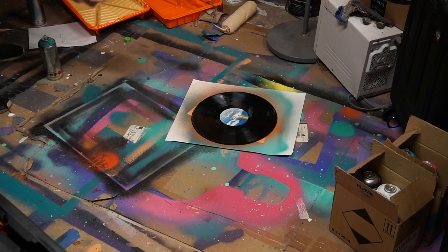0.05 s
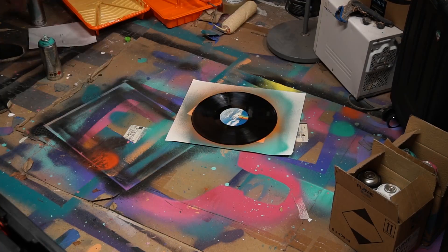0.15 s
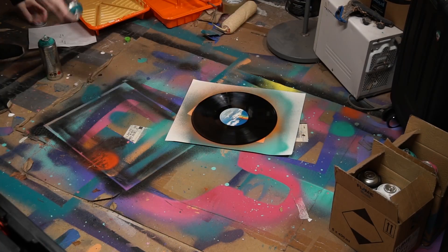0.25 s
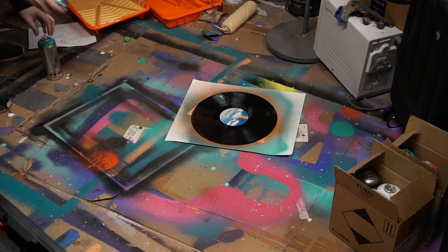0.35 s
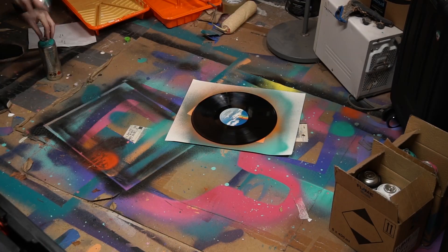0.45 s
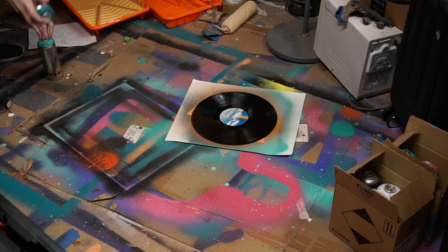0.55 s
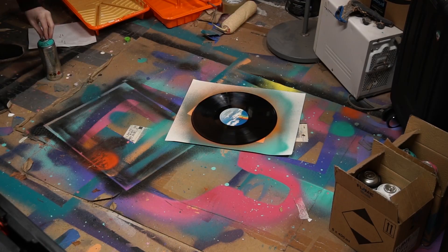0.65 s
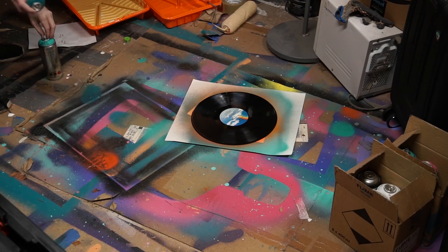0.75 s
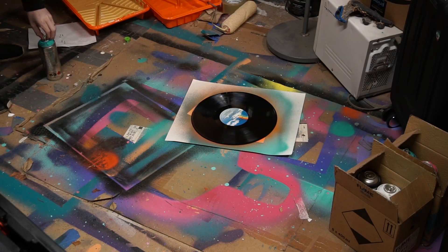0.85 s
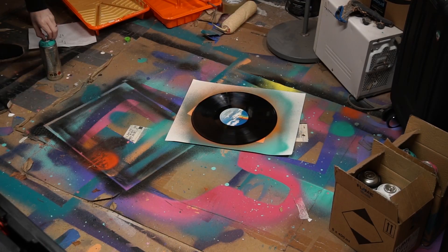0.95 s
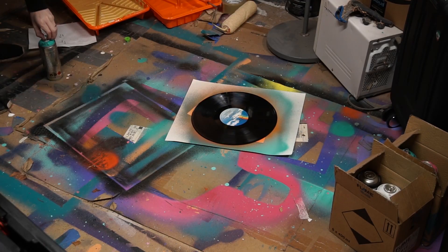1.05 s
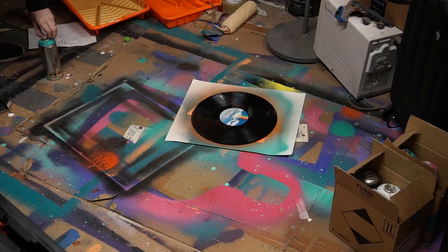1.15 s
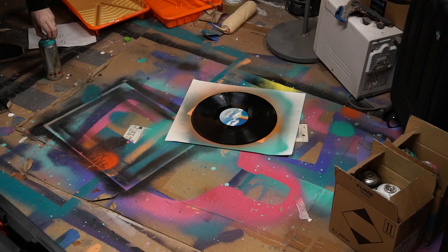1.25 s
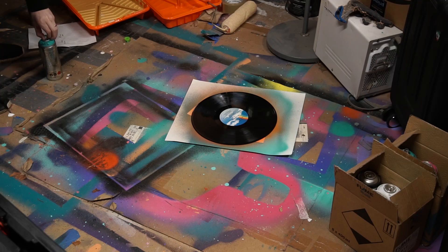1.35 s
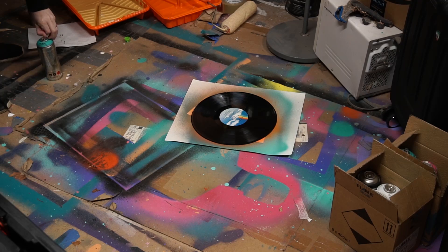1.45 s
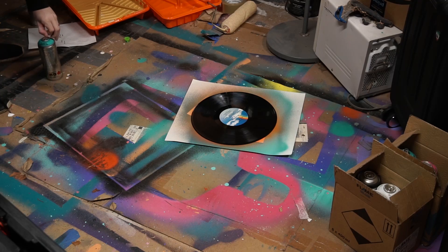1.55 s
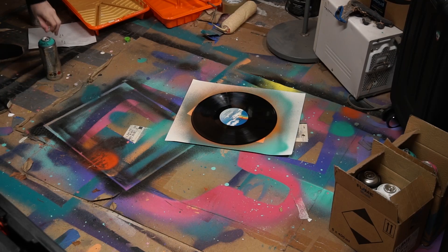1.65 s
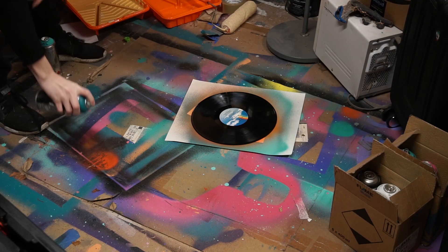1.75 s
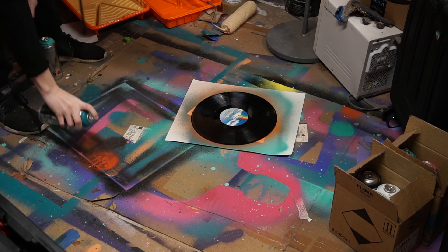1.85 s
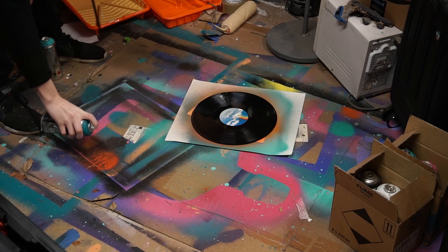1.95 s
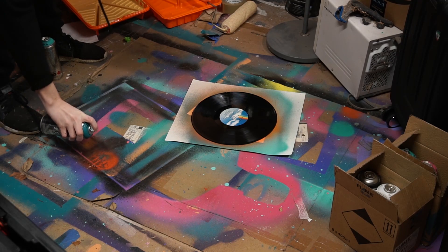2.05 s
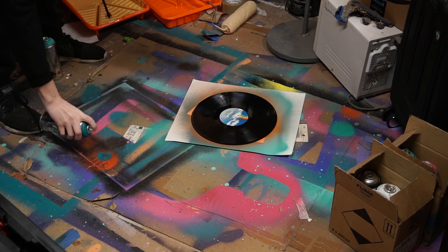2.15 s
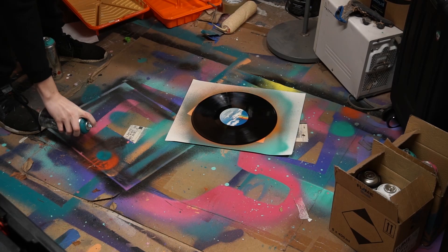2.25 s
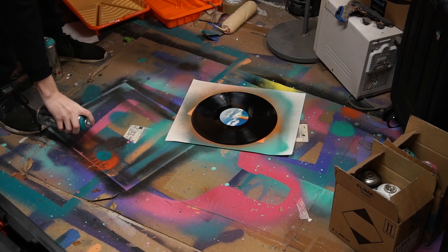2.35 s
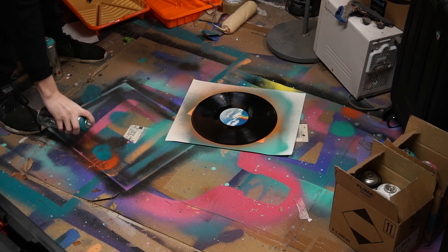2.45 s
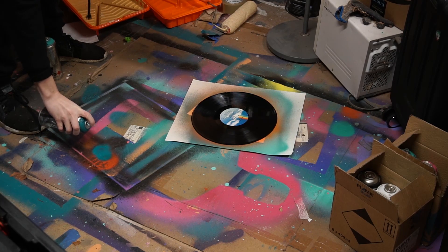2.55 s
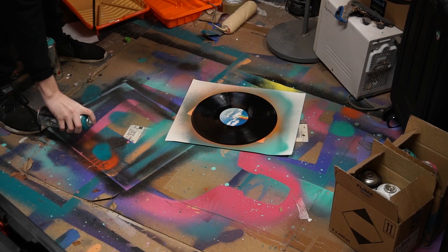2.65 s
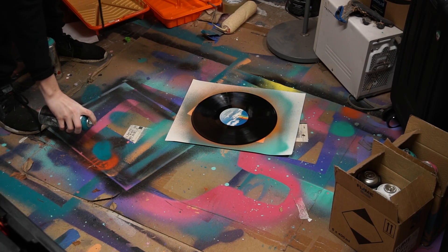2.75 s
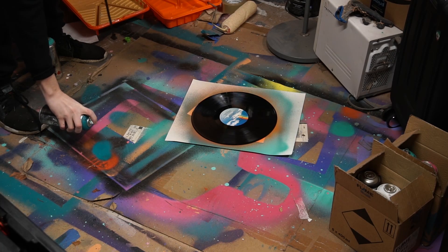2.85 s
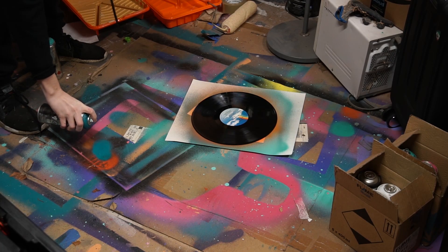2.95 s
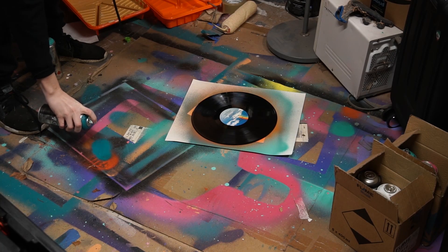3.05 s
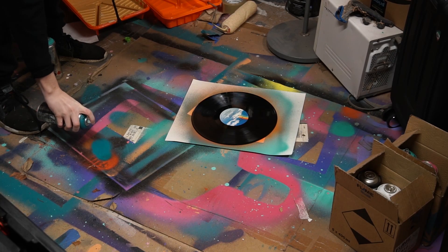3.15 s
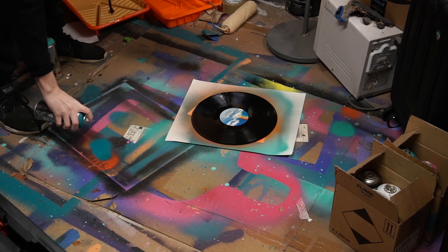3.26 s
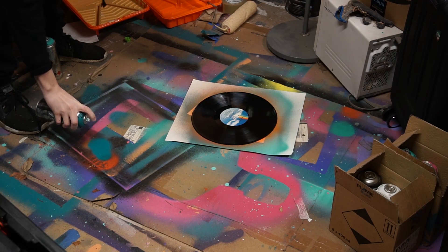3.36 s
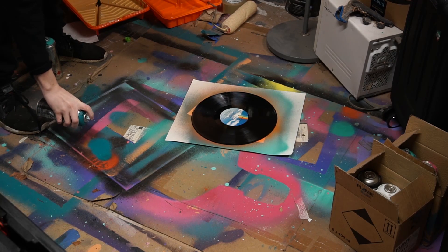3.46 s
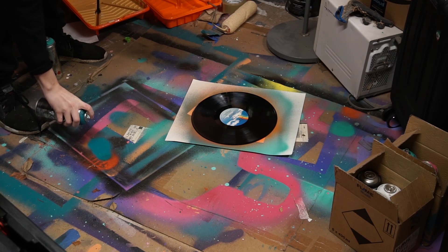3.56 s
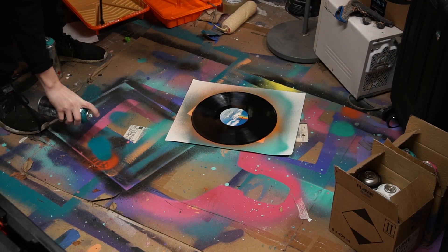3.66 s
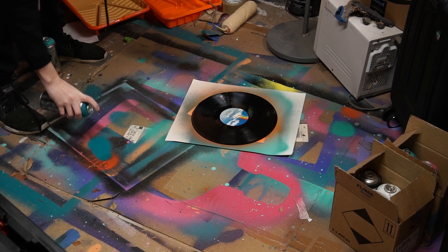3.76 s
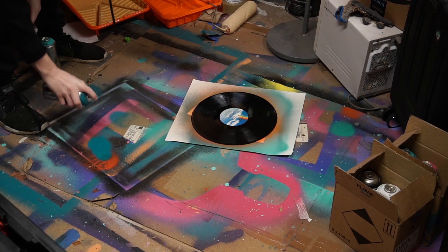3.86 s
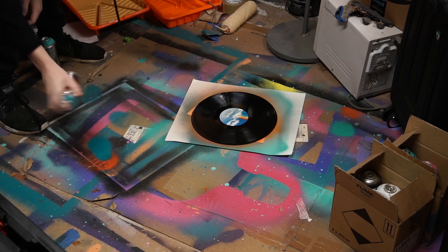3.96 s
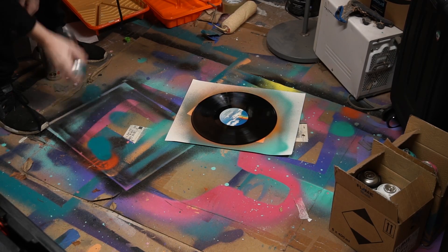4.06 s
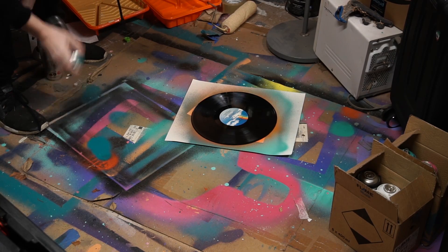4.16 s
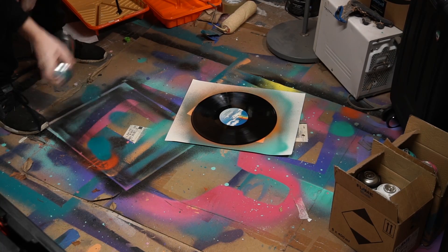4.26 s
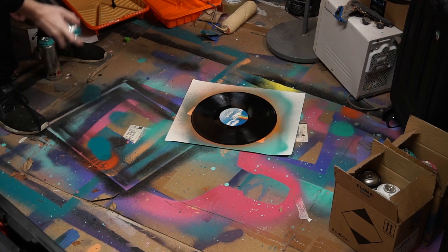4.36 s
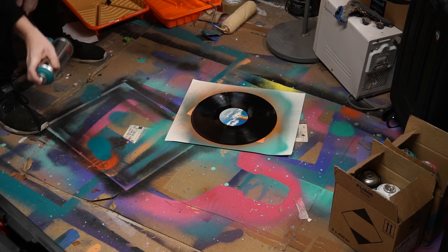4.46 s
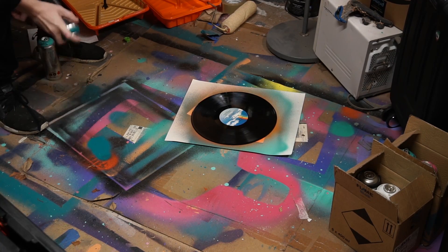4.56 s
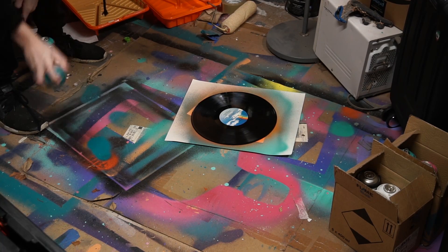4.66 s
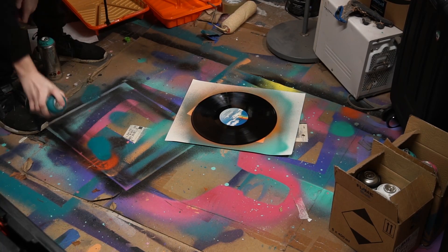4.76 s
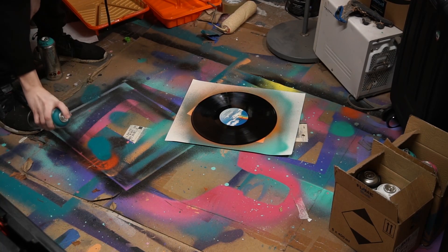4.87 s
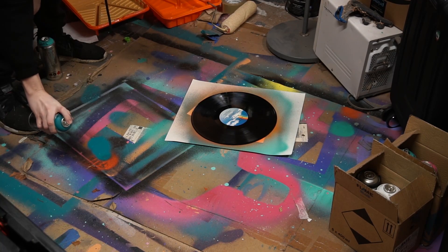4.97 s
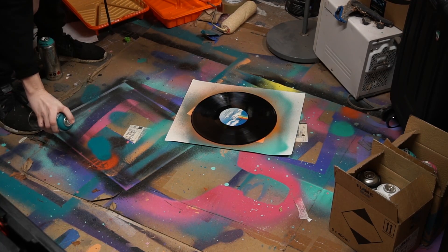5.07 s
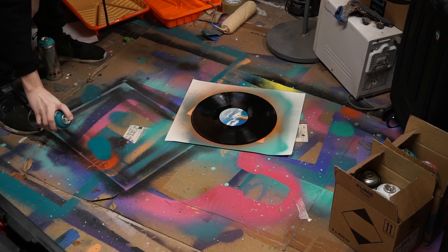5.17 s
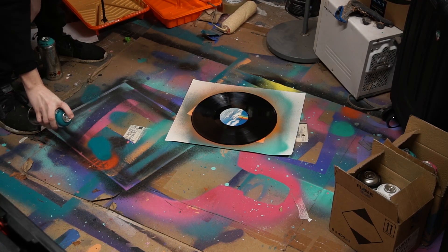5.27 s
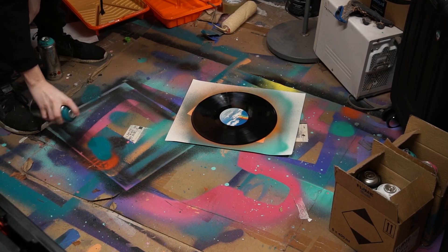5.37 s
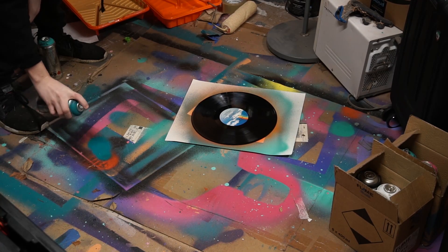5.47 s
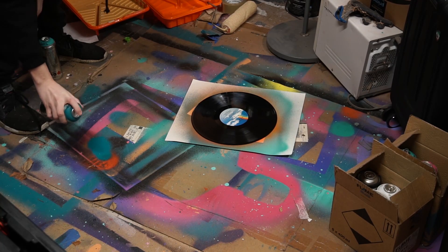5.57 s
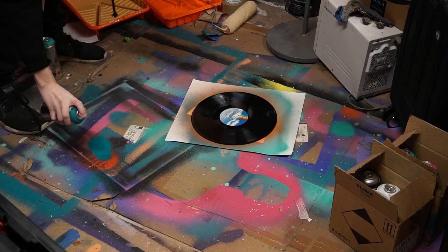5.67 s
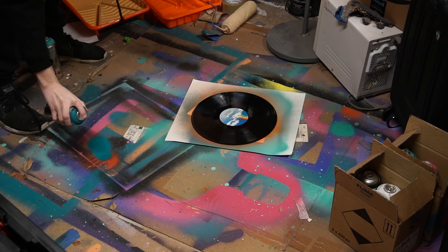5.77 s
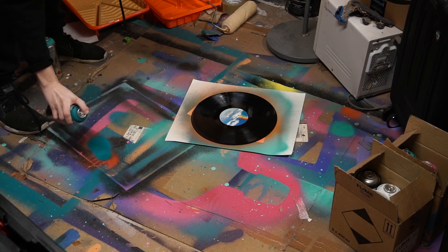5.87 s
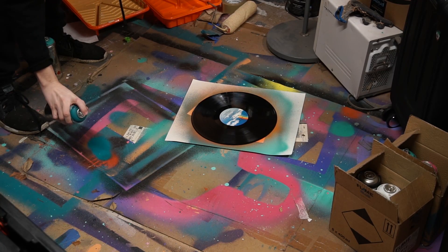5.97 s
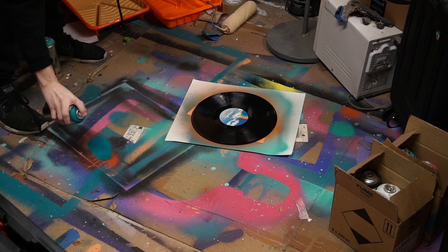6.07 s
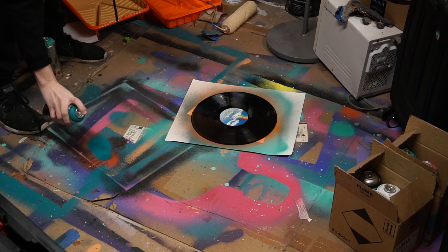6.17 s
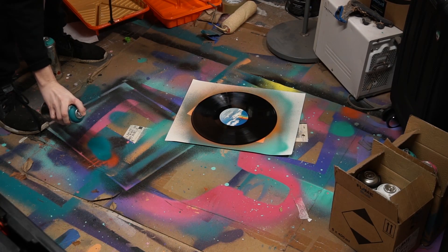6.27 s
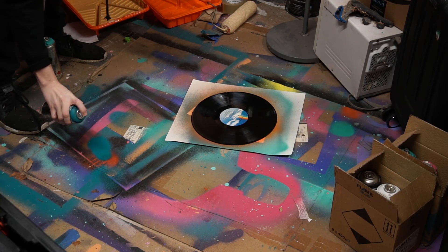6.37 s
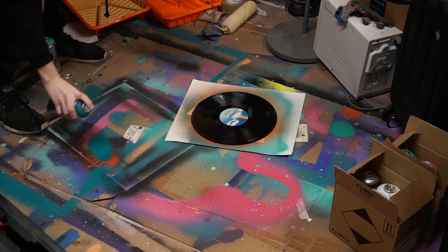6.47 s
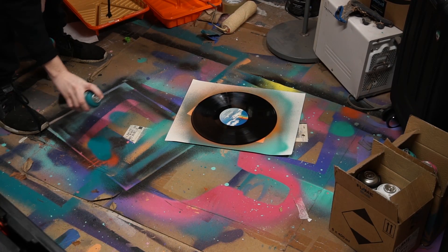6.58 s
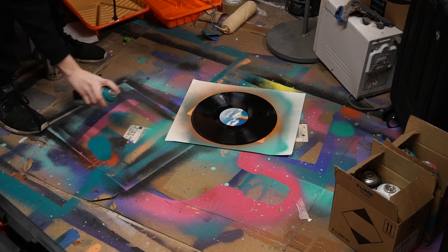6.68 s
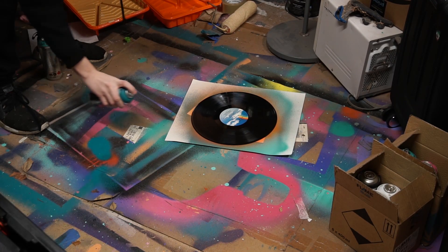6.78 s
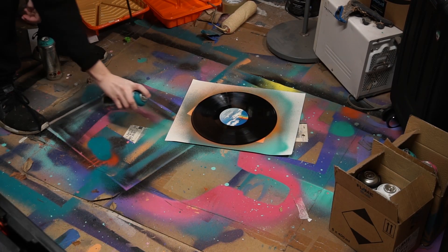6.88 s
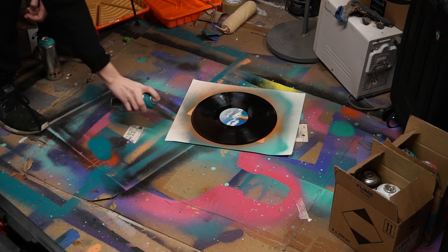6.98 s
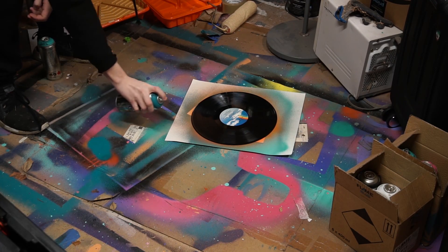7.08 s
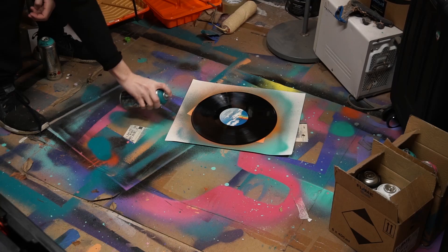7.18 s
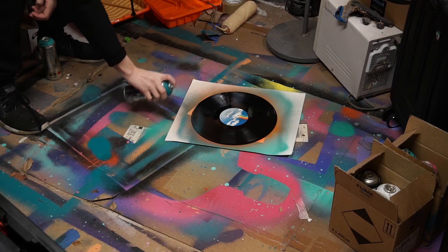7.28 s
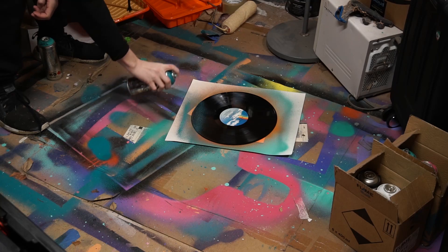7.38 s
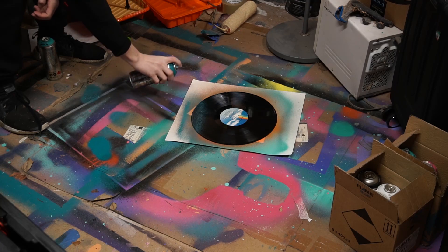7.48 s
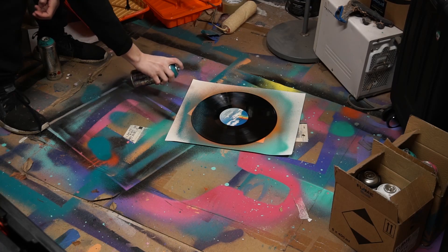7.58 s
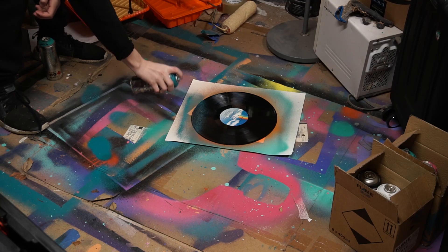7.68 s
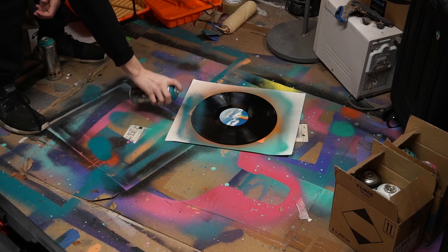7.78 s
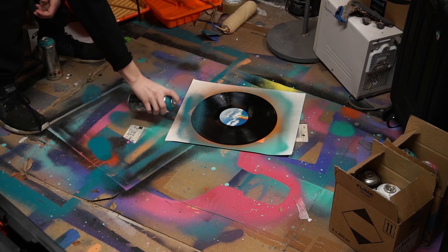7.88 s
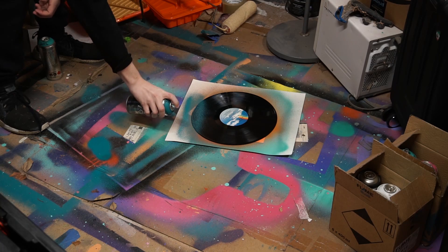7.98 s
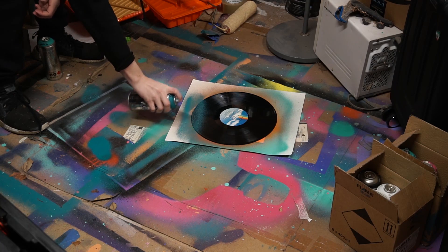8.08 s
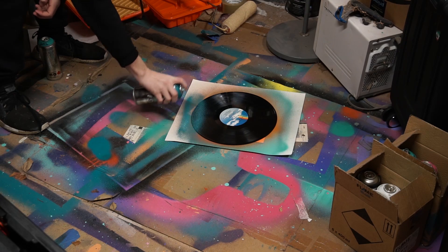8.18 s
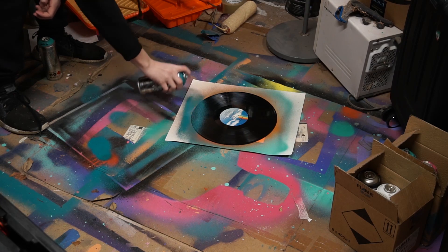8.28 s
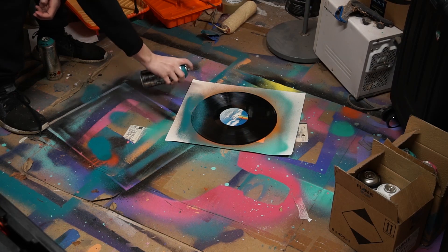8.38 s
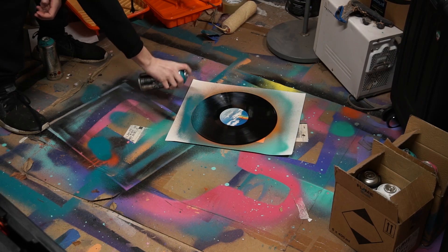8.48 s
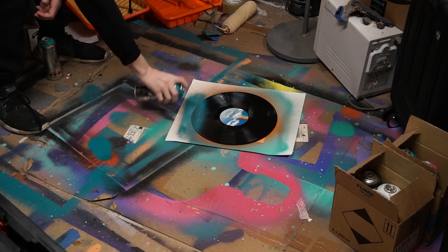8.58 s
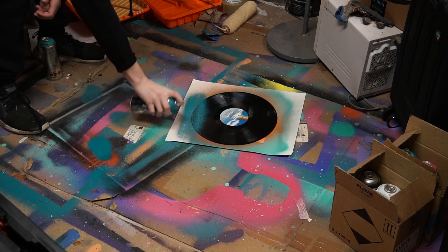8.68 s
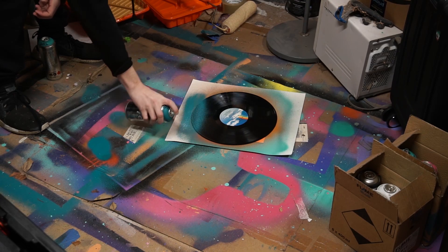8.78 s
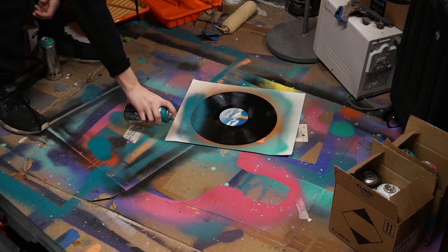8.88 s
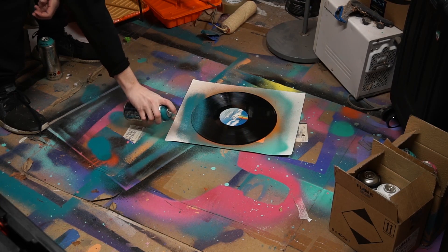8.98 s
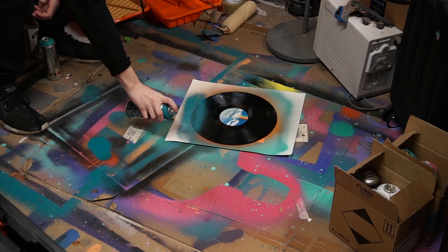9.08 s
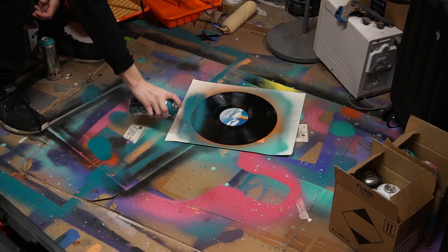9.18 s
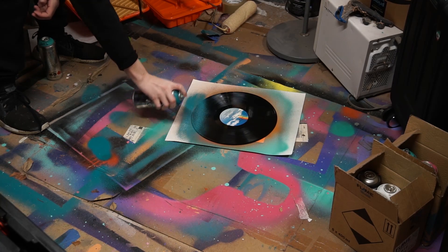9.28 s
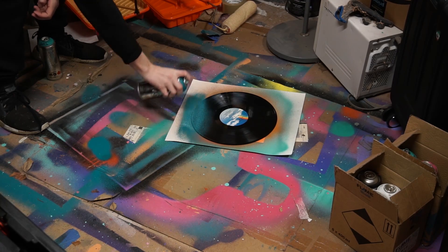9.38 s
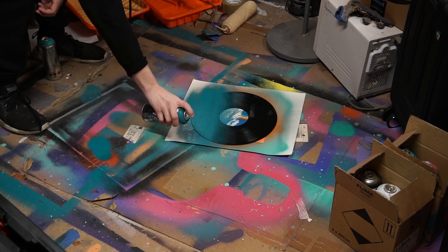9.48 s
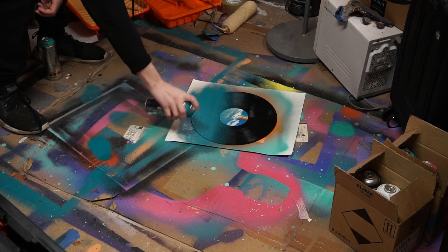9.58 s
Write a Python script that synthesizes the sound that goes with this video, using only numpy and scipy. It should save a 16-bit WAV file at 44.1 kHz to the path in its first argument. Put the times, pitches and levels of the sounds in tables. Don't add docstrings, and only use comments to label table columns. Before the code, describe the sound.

In an indoor workshop, a paint can is picked up with a light clink and rustle, then shaken loudly, its mixing balls cracking on the thin steel wall. The rattle is chopped off abruptly, and a row of short, soft aerosol hisses begins with faint foot knocks. A second brief shake, a little ball rolling, then more spaced puffs. The microphone is fairly close; a low fan rumble and airy hiss stay beneath.

```python
import sys
import numpy as np
from scipy import signal
from scipy.fft import rfft, irfft, next_fast_len
from scipy.io import wavfile
from scipy.ndimage import uniform_filter1d, map_coordinates

SR = 44100
rng = np.random.default_rng(int(sys.argv[2]) if len(sys.argv) > 2 else 0)


def amplitude_ratio(level_db):
    exponent = np.asarray(level_db, float) / 20
    return 10 ** exponent


def master(y):
    cut = np.clip(np.atleast_2d(y).T, -1, 1)
    pcm = np.round(cut * 32767)
    wavfile.write(sys.argv[1], SR, pcm.astype(np.int16))


N = 424683
SECONDS = np.arange(N) / SR
CUT_S = 1.741

# opening in seconds, hold in seconds, peak in dB, place of the peak in the hold [0-1],
# delay of the echo off the sprayed surface in ms.
PUFFS = [(1.74, 0.21, -38, .45, 0.4), (2.071, .25, -36.5, 0.44, 0.37), (2.388, 0.22, -35.5, 0.06, 0.4),
         (2.672, .22, -35.5, 0.05, 0.37), (2.97, 0.21, -36, 0.1, 0.35), (3.248, 0.21, -36, 0.05, 0.37),
         (3.548, 0.2, -35.5, 0.2, 0.37), (4.973, 0.25, -37.5, 0.73, 0.4), (5.719, 0.23, -35.5, 0.86, 0.42),
         (6.05, 0.19, -33.5, 0.6, 0.42), (6.331, .19, -32.5, 0.63, 0.426), (7.155, 0.35, -35, 0.16, 0.424),
         (7.678, 0.27, -35.5, 0.53, 0.38), (8.097, 0.27, -35, 0.8, 0.35), (8.524, 0.27, -35.5, 0.03, 0.4),
         (9.259, 0.23, -37, 1, 0.41), (9.618, .1, -36, .5, 0.3)]


def knocks():
    # start in seconds, peak in dB, hollow body re peak in dB (high on the domed end, low
    first_shake = [(0.4161, -.5, -25), (0.4218, -11, -6.5), (0.4758, -11, 0), (0.4956, -16, -6.5),
                   (0.5304, -3, -14), (.5436, -5, -9), (0.6164, -3, -29), (0.6407, -1, -20),
                   (0.7261, -13.5, -0.5), (0.7997, -8, -7.5), (0.8738, -1.5, -17), (0.9028, -0.5, -24.5),
                   (1.026, -5, -8), (1.0513, -8.5, -14), (1.1224, -3.5, -20.5), (1.1577, -3.5, -18),
                   (1.176, -9, -36), (1.2065, -13, -11), (1.2199, -7, -12), (1.2881, -4.5, -7.5),
                   (1.3, -8.5, -14), (1.3887, -4.5, -23.5), (1.394, -5, -16), (1.4183, -3.5, -30),
                   (1.4832, -10.5, -11), (1.5489, -5.5, -7), (1.6797, -3.5, -37), (1.6868, -8.5, -22),
                   (1.708, -3, -17), (1.7254, -34, -8)]
    second_shake = [(4.012, -10, -9), (4.0376, -13, -7.5), (4.1181, -0.7, -18), (4.1786, -8.5, -6),
                    (4.2085, -6, -8), (4.2203, -7.5, -11), (4.2735, -16.5, 0), (4.3147, -15.5, -0.5),
                    (4.3368, -0.5, -16.5), (4.342, -2.5, -24.5), (4.4424, -5, -8.5), (4.4582, -7.5, -9.5),
                    (4.5434, -5, -20.5), (4.5632, -7.5, -40), (4.574, -4, -40), (4.6007, -9.5, -16.5),
                    (4.6843, -6, -9.5), (4.7598, -13.5, -8)]
    light_knocks = [(.25, -12.5, -12.5), (.2714, -20, -21), (1.8781, -24.5, -5), (1.8862, -30, -5.5),
                    (2.193, -41, 1), (2.2767, -27.5, -5), (3.939, -38, -14), (5.0925, -23.5, -29),
                    (5.217, -18, -5.5), (5.3351, -28.5, -9.5), (5.4269, -16.5, -7), (5.486, -26, -11.5),
                    (5.729, -33.5, -3), (5.757, -33, -3.5)]
    # frequency in Hz, gain in dB.
    can_ring = [(180, -56.5), (300, -29), (432, -19.5), (469, -16.5), (526, -17.5), (581, -14),
                (1370, -5.5), (1540, -6.5), (1910, -0.5), (3300, -2), (5150, 3.5), (7540, 0), (8600, 0.5),
                (11800, 0.5), (15600, -8.5)]
    chatter_db, chatter_s, chatter_per_s = -18.5, 0.036, 450
    pan_db, swing_db = 2, -0.5
    body_shift = 0.12

    t, out = SECONDS[:SR // 8], np.zeros((2, N))
    for s, db, body_db in first_shake + second_shake + light_knocks:
        noise, luck = rng.standard_normal((2, len(t))), rng.random(len(t))
        ticks = (luck < chatter_per_s / SR) * np.sign(noise[1])
        ticks = ticks * amplitude_ratio(chatter_db + 3 * noise[0]) * np.exp(-t / chatter_s)
        force = (t == 0) + ticks
        shift = np.exp(body_shift * noise[0, 1])
        tick_db = -14.5 - 0.074 * (body_db + 11.5) + 0.2 * (db + 2)
        blow = colour(force, [
            (1200 * shift, body_db + 16.5 + 0.39 * db),
            (1700 * shift, body_db + 15.5),
            (2300 * shift, body_db + 14.5),
            (3800 * shift, 0.0045),
            (8000, 0),
            (9500, tick_db + 9.5)])
        add(out, s, amplitude_ratio(db + 8.5) * pan(pan_db + swing_db * noise[1, 0])[:, None] * blow)
    return colour(out, can_ring)


def clinks():
    # start in seconds, peak in dB.
    touches = [
        (0.2483, -16),
        (0.2694, -25),
    ]
    # frequency in Hz, level in dB, t60 in seconds.
    touch_modes = [
        [(1975, -15.5, 0.23), (7160, 0, .06), (9340, -4.5, .1), (10100, -10.5, .08), (10640, 2, 0.089),
         (11850, -14, .1)],
        [(2040, -19, 0.13), (7397, 4, .12), (7400, -6, 0.065), (7700, 0.5, .1), (9200, -25, .1)],
    ]
    t, out = SECONDS[:SR // 2], np.zeros(N)
    for (s, db), modes in zip(touches, touch_modes):
        ring = sum(amplitude_ratio(g - 60 * t / t60) * np.sin(2 * np.pi * hz * t) for hz, g, t60 in modes)
        add(out, s, amplitude_ratio(db - 15.0) * ring)
    return out * pan(1.5)[:, None]


def nozzle(s):
    # time in seconds, left minus right in dB, facing [0-1].
    aim = [(1.7, 2, 0.7), (6.5, 2, 0), (7.2, -2, 0.81), (9.6, -2, 0.65)]
    times, *columns = np.transpose(aim)
    return [np.interp(s, times, c) for c in columns]


def valve(open_db, sag_db):
    shut_db, open_s, close_s = -28.5, 0.014, 0.033
    facing_flat = 0.4
    flow = np.zeros(N)
    for s, held, db, place, _ in PUFFS:
        peak_s = open_s + np.clip(place, .02, .98) * (held - open_s)
        times = s + np.array([0, open_s, peak_s, held, held + close_s])
        release_db = sag_db * (1 - facing_flat * nozzle(s)[1])
        levels = [shut_db, open_db, 0, release_db, shut_db]
        flow += amplitude_ratio(db + np.interp(SECONDS, times, levels, left=-120, right=-120))
    return flow


def puffs():
    # frequency in Hz, level in dB per Hz.
    jet = [(710, -58), (1200, -21), (1270, -20), (1660, -21.5), (1820, -16), (2260, -14.5), (3290, -12.5),
           (4440, -7.5), (5940, -12), (8110, -5.5), (8930, -11), (12500, -2), (15100, -6.5), (15600, -5)]
    open_db, sag_db = -4, -6
    roar_db, roar_follows = -11.5, 0.038
    sputter_db, echo_db, echo_drift = 1.5, -12, 0.08
    sweep_db = 4

    drops = amplitude_ratio(sputter_db * walk(300))
    bands = []
    for lo in 1000 * 2 ** np.arange(0, 4.5, .5):
        bands.append(band(rng.standard_normal(N), lo, lo * 2 ** .5) * drops * amplitude_ratio(1.1 * walk(17)))
    bands = colour(bands, jet)
    roar, hiss = bands[:6].sum(0), bands[6:].sum(0)
    heard = amplitude_ratio(roar_db) * valve(roar_follows * open_db, roar_follows * sag_db) * unit(roar)
    heard = heard + valve(open_db, sag_db) * unit(hiss)

    s, held, _, _, echo_ms = np.transpose(PUFFS)
    sweep = np.interp(SECONDS, np.ravel([s, s + held], order="F"), np.tile([.5, -.5], len(s)))
    lag = np.interp(SECONDS, s + held / 2, echo_ms) * SR / 1000
    lag = lag * (1 + echo_drift * sweep + .02 * walk(4))
    heard = heard + amplitude_ratio(echo_db) * map_coordinates(heard, [np.arange(N) - lag], order=3)

    pan_db, facing = nozzle(SECONDS)
    head_on = colour(heard, [(11000, -0.77), (14500, 3)])
    heard = heard + facing * (head_on - heard)
    heard = heard * amplitude_ratio(.9 * walk(40))
    return heard * pan(pan_db + sweep_db * sweep)


def rustle():
    # start in seconds, attack in seconds, peak in dB, fall in dB per second.
    strokes = [
        (0.013, 0.049, -41, 54.5),
        (.29, 0.085, -45.5, 81.5),
    ]
    grain = band(rng.standard_normal((2, N)) * amplitude_ratio(2.6 * walk(370)), 1800, 14000)
    level = np.zeros(N)
    for s, attack, db, fall_db in strokes:
        rise = np.clip((SECONDS - s) / attack, 0, 1)
        level += rise * amplitude_ratio(db - fall_db * np.maximum(SECONDS - s - attack, 0))
    return unit(grain) * level * (SECONDS < CUT_S)


def thuds():
    # start in seconds, peak in dB, start in Hz, end in Hz, t60 in seconds, slap in dB.
    steps = [
        (1.757, -43, 980, 850, 0.081, -39),
        (2.001, -41, 492, 626, 0.24, -54),
        (2.075, -55, 634, 630, 0.03, -69),
        (7.428, -39, 404, 382, 0.27, -39),
    ]
    t, out = SECONDS[:SR // 3], np.zeros((2, N))
    for s, db, start_hz, end_hz, t60, slap_db in steps:
        hz = end_hz + (start_hz - end_hz) * np.exp(-t / 0.024)
        wobble = uniform_filter1d(rng.standard_normal(len(t)), size=SR // 400)
        ring = np.sin(2 * np.pi * np.cumsum(hz) / SR) * np.minimum(t / 0.002, 1)
        add(out, s, amplitude_ratio(db - 60 * t / t60) * (0.96 + 1.0 * unit(wobble)) * ring)
        slap = unit(band(rng.standard_normal(len(t)), 466, 2800))
        add(out, s, amplitude_ratio(slap_db - 60 * t / 0.19) * slap)
    return out


def room(x, wet_db):
    # octave centre in Hz, t60 in seconds, side share [ratio].
    octaves = [(365, 0.56, .15), (770, 0.67, 0.24), (1486, 0.51, 0.37), (2940, 0.46, 0.53),
               (5070, 0.36, 0.84), (10900, 0.26, 0.93)]
    t, wet = SECONDS[:SR // 2], np.zeros((2, N))
    tails = 0
    for hz, t60, share in octaves:
        mid, side = band(rng.standard_normal((2, 5, len(t))), hz / 2 ** .5, hz * 2 ** .5)
        tails = tails + amplitude_ratio(-60 * t / t60) * np.array([mid + share * side, mid - share * side])
    lumps = amplitude_ratio(4.5 * np.exp(-t / .06) * walk(1500)[:5 * len(t)].reshape(5, -1))
    tails = tails * lumps * (t > .0004) * (1 + 1.03 * np.exp(-t / 0.0014))
    tails = tails / np.sqrt(np.sum(tails ** 2, axis=(0, 2), keepdims=True) / 2)
    place = (SECONDS * 4).astype(int) % 5
    for k in range(5):
        wet += signal.oaconvolve((x.mean(0) * (place == k))[None], tails[:, k], axes=1)[:, :N]
    return x + amplitude_ratio(wet_db) * wet


def ducking(rattle):
    release_s, from_db, share = 0.19, -50.5, 0.42
    keep, first, power = np.exp(-1 / (release_s * SR)), SECONDS < CUT_S, rattle.mean(0) ** 2
    held = np.where(first, *signal.lfilter([1 - keep], [1, -keep], [power, power * ~first]))
    return -share * np.maximum(10 * np.log10(held + 1e-12) - from_db, 0)


def fan_and_air(duck_db):
    # time in seconds, load in dB.
    fan_load = [(0, -3), (1.74, -1.5), (1.76, 5.5), (2.35, 4.5), (2.9, 1), (4.1, 0), (5.2, -2.5),
                (6.1, -2.5), (7.6, -2), (9.63, -2.1)]
    # frequency in Hz, level in dB per Hz.
    rumble_spectrum = [(15, -37), (30, 1), (80, -2.5), (108, 1), (140, -1.5), (172, 0.5), (260, -8.5),
                       (340, -43), (570, -120)]
    air_spectrum = [(150, -44), (260, -17), (336, -13.5), (450, -22.5), (490, -23), (572, -24.5),
                    (623, -24), (924, -20), (1170, -24.5), (1260, -27), (15600, -28)]
    rumble_level_db, drone_level_db, hiss_db, swell_db = -62, -63, -65, 1.5

    load_db = np.interp(SECONDS, *np.transpose(fan_load))
    rumble_db = rumble_level_db + load_db + duck_db + swell_db * walk(1.946)
    drone_db = drone_level_db + 0.97 * load_db - 0.15 * duck_db + swell_db * walk(3.5)
    mid, side = rng.standard_normal((2, N))
    side = colour(side, [(25, -32.5), (125, -14), (300, -5.5), (700, -0.5), (2000, 0.5)])
    air = mid + side * np.array([[1], [-1]])
    rumble, rest = colour(air, rumble_spectrum), colour(air, air_spectrum)
    drone, hiss = band(rest, 330, 1700), band(rest, 1300, 17000)
    return unit(rumble) * amplitude_ratio(rumble_db) + unit(drone) * amplitude_ratio(drone_db) - unit(hiss) * amplitude_ratio(hiss_db)


def blade_tone():
    # centre in seconds, half length in seconds, frequency in Hz, level in dB.
    blade_swells = [
        (2.297, 0.34, 171.6, -60.5),
        (3.006, 0.39, 170.7, -58),
        (3.88, .07, 169, -65),
        (6.779, 0.18, 170, -73),
        (8.02, 0.58, 166.4, -60.5),
        (8.99, 0.21, 166.6, -59.5),
        (9.63, .15, 157, -60.5),
    ]
    s, _, hz, _ = np.transpose(blade_swells)
    turn = 2 * np.pi * np.cumsum(np.interp(SECONDS, s, hz)) / SR
    swells = sum(amplitude_ratio(db) * np.exp(-((SECONDS - s) / half) ** 2) for s, half, _, db in blade_swells)
    swells = swells * (SECONDS > CUT_S) * amplitude_ratio(2.0 + 1.3 * walk(8.7))
    return swells * (np.sin(turn) + amplitude_ratio(-12.5) * np.sin(2 * turn))


def mains_hum(duck_db):
    # frequency in Hz, rms level in dB.
    harmonics = [(240, -79), (300, -80), (360, -76), (480, -80), (600, -85)]
    hum = 0
    for hz, db in harmonics:
        hum = hum + 2 ** .5 * amplitude_ratio(db + 2.1 * walk(3.7)) * np.sin(2 * np.pi * hz * SECONDS)
    return hum * amplitude_ratio(np.minimum(duck_db + 0.5, 0))


def octave_hum():
    # centre in seconds, half length in seconds, frequency in Hz, level in dB.
    octave_swell = (6.7, .35, 337, -66)
    s, half, hz, db = octave_swell
    hum = unit(band(rng.standard_normal(N), hz - 12, hz + 12))
    return amplitude_ratio(db) * np.exp(-((SECONDS - s) / half) ** 2) * hum


def colour(x, points):
    hz, db = np.transpose(points)
    length = np.shape(x)[-1]
    size = 2 * next_fast_len(length // 2 + 2048)
    log_hz = np.log(np.fft.rfftfreq(size, 1 / SR) + 1)
    cepstrum = irfft(np.interp(log_hz, np.log(hz), db) * np.log(10) / 20, size)
    cepstrum[1:size // 2] *= 2
    cepstrum[size // 2:] = 0
    return irfft(rfft(x, size) * np.exp(rfft(cepstrum)), size)[..., :length]


def band(x, lo_hz, hi_hz):
    sos = signal.butter(2, [lo_hz, min(hi_hz, .45 * SR)], "band", fs=SR, output="sos")
    return signal.sosfilt(sos, x)


def unit(x):
    return x / np.sqrt(np.mean(x ** 2))


def walk(rate_hz):
    k = max(int(SR / rate_hz), 1)
    held = np.repeat(rng.standard_normal(N // k + 1), k)
    return unit(uniform_filter1d(held, k)[:N])


def pan(db):
    return amplitude_ratio(np.array([db, -db]) / 2)


def add(out, s, x):
    i = int(s * SR)
    out[..., i:i + x.shape[-1]] += x[..., :N - i]


def scene():
    near, first = knocks() + clinks(), SECONDS < CUT_S
    rattle = room(near * first, 6) * first + room(near * ~first, 6)
    spray = room(puffs(), -0.36) * amplitude_ratio(-1.0)
    handling = room(rustle() + thuds(), -5)
    duck_db = ducking(rattle)
    background = fan_and_air(duck_db) + blade_tone() + mains_hum(duck_db) + octave_hum()
    return rattle + spray + handling + background


def roll_off(x):
    return signal.sosfilt(signal.butter(12, 16990, fs=SR, output="sos"), x)


def record(dry):
    # frequency in Hz, gain in dB.
    top_edge = [(15700, 0), (15850, -34), (16300, -44)]
    drive = 1.05
    faded = dry * np.minimum(SECONDS / 0.0072, 1)
    limited = np.tanh(drive * faded) / drive
    return roll_off(colour(limited, top_edge))


dry = scene()
out = record(dry)
master(out)
```